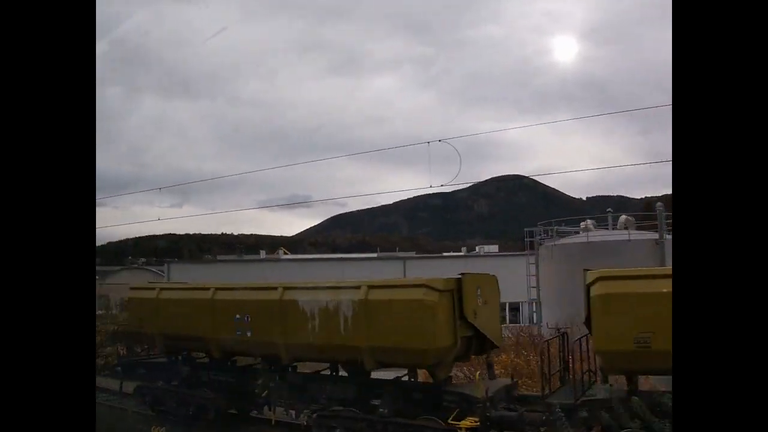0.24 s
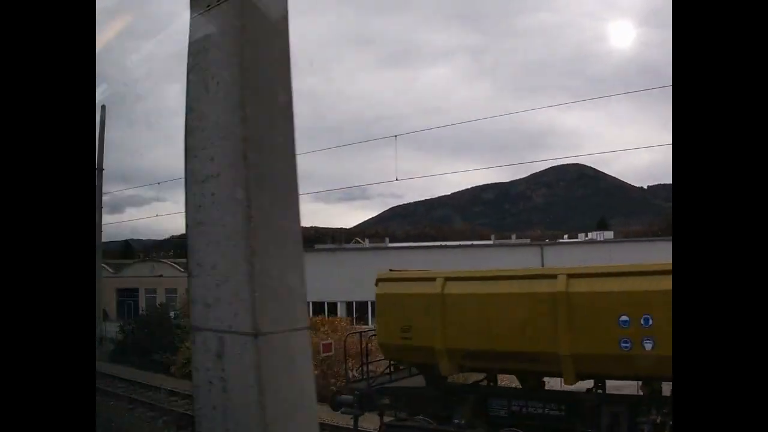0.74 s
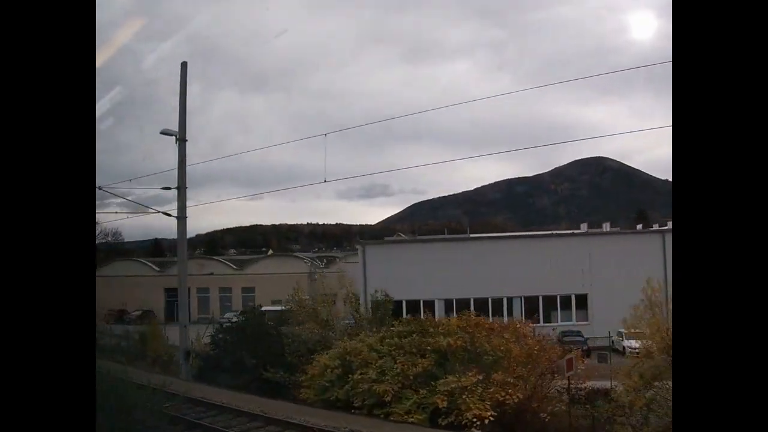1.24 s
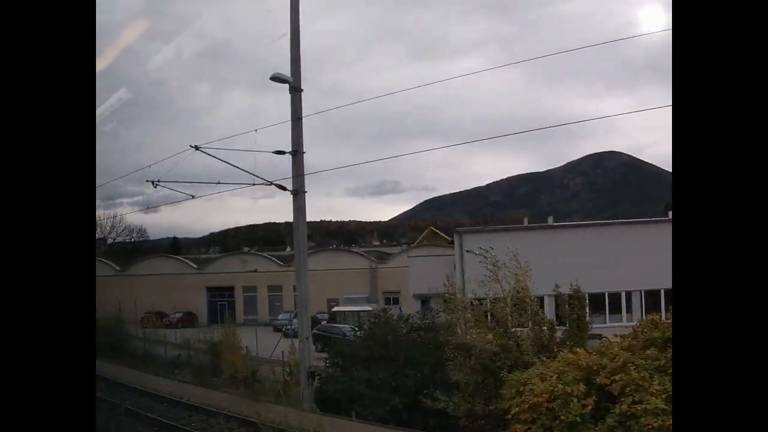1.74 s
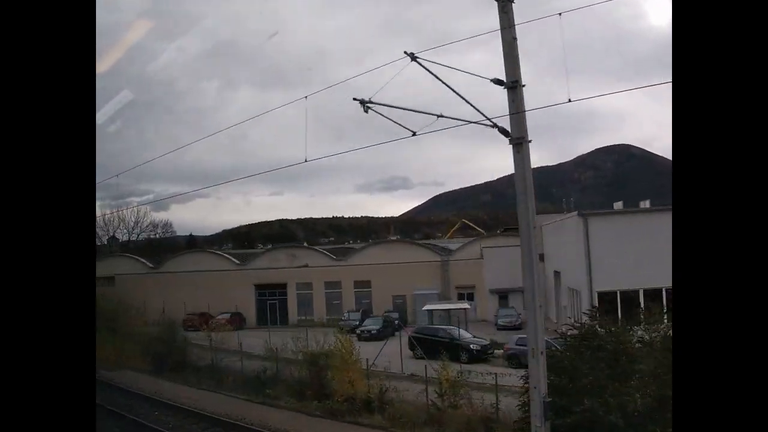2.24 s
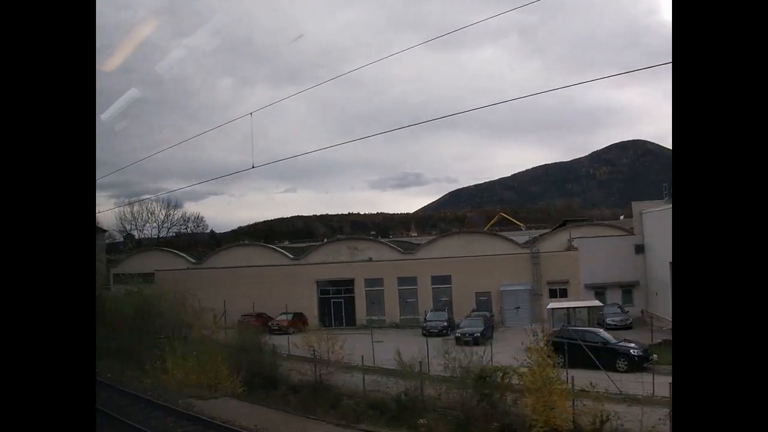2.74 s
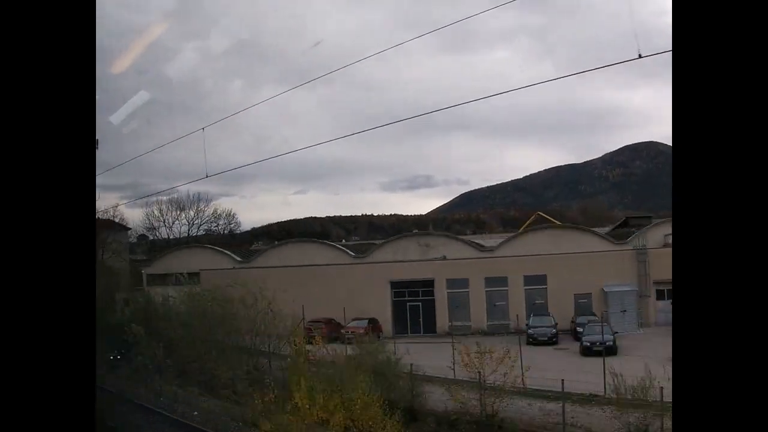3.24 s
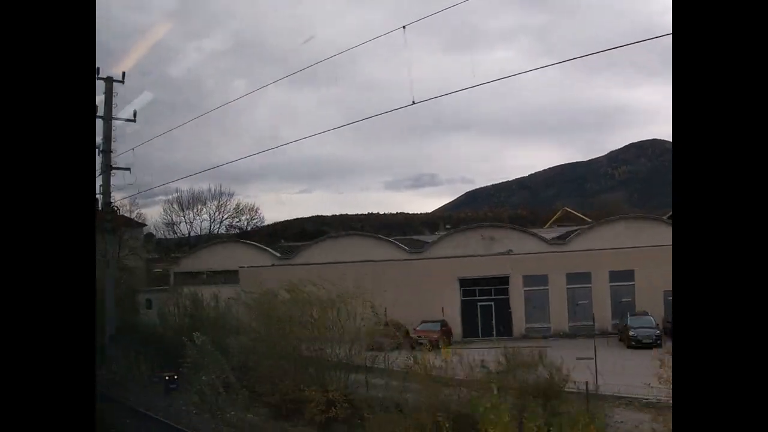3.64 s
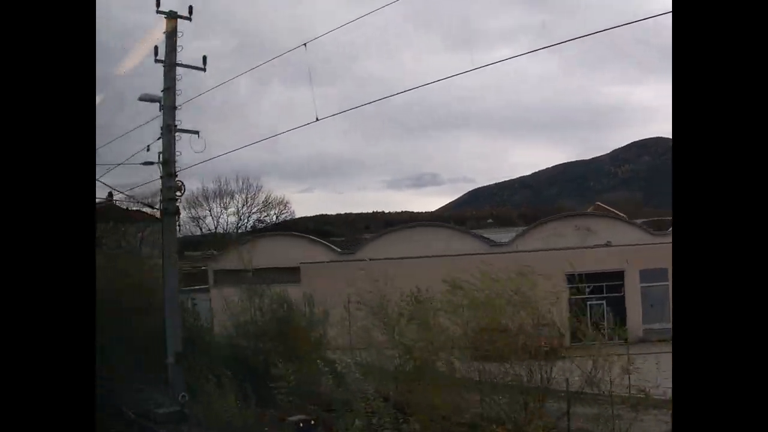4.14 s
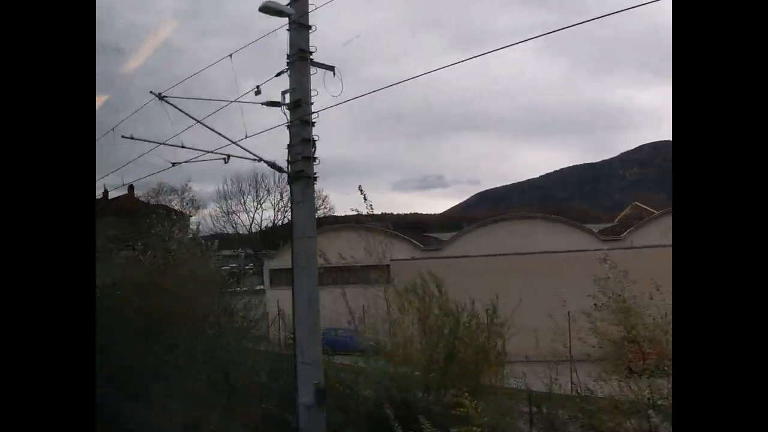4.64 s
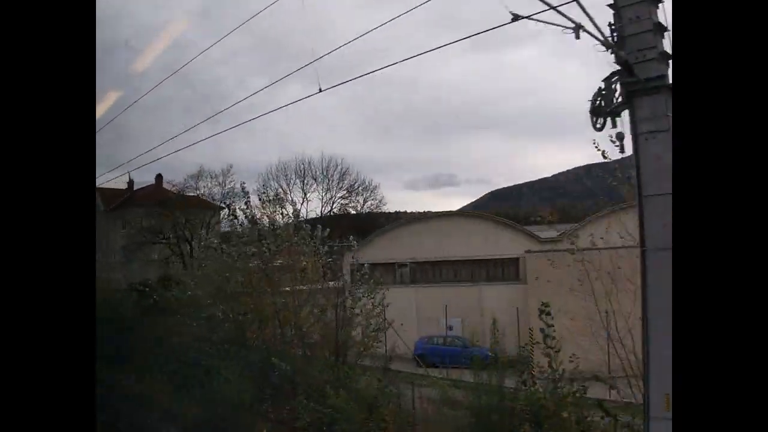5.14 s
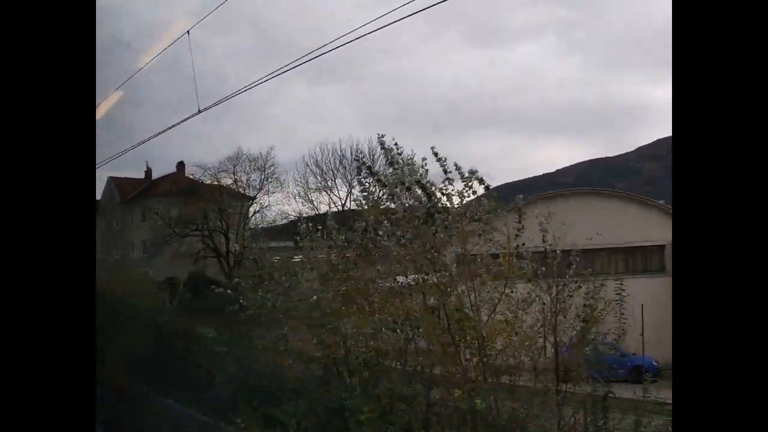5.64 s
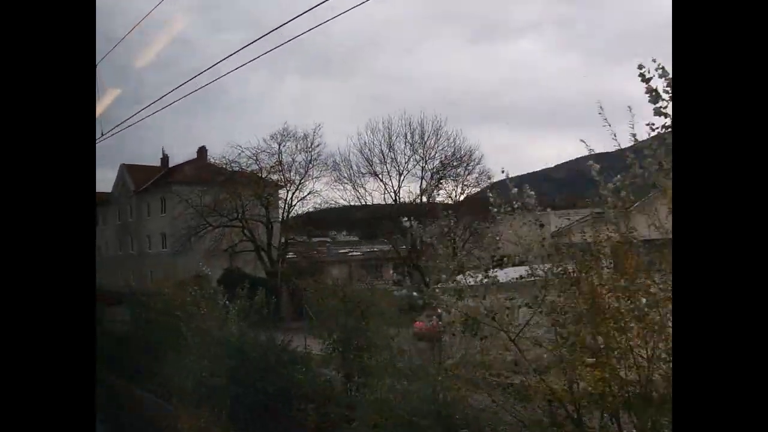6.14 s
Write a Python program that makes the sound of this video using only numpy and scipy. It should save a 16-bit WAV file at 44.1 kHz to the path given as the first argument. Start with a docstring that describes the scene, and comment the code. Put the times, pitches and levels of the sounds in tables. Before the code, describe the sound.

Heard from inside a rolling electric train carriage: a low, wavering wheel rumble and a muffled roar fill the cabin. Body resonances boom more strongly in the first two seconds as the track jolts. Fine rustling and airy hiss flutter above, with faint high electrical whines. A bright ping sounds around 2.4 seconds, followed by denser small clicks and hollow panel knocks, while the train keeps rolling steadily.

```python
"""Inside a rolling electric train carriage, with the microphone in the cabin. The wheels pass the sleepers as a
wavering low sine; bands of noise and two booming resonances are the car body, lifted now and then by a jolt.
Coloured noise makes the dull roar of rolling and ventilation, and a fine crackling rustle above it. Faint
electrical whines are mostly very narrow noise, with one broader hissing band; clicks are noise bursts with a
short cabin tail, the strongest with sharp noisy attacks, among damped-sine panel knocks and brief sine pings."""
import sys
import numpy as np
from scipy import signal
from scipy.io import wavfile
from scipy.ndimage import uniform_filter1d

SR = 44100
rng = np.random.default_rng(int(sys.argv[2]) if len(sys.argv) > 2 else 0)


def log_audio(samples):
    """Write samples as a 16-bit WAV file to the path given in sys.argv[1]."""
    # one column per channel
    frames = np.atleast_2d(samples).T
    # limit to full scale, then quantise
    limited = np.clip(frames, -1, 1)
    pcm = np.round(limited * 32767).astype(np.int16)
    wavfile.write(sys.argv[1], SR, pcm)


N = 281358   # samples in the scene

# Jolts from the track: (time [s], sway level [dB], floor shake level [dB], lower boom level [dB],
# upper boom level [dB], lower boom pitch [Hz])
JOLTS = [(0.071, -21, -24.5, -24, -33, 151), (.14, -36, -30, -39, -19.5, 150),
         (0.219, -33, -50, -11.5, -25, 146), (.39, -23, -45, -26.5, -23.5, 146),
         (.51, -47, -40, -23, -23, 148), (.7, -24, -47, -40, -25, 150), (.79, -36, -37, -25.5, -23.5, 150),
         (.99, -29, -38, -21.5, -20.5, 146), (1.14, -32, -44, -36, -28, 146),
         (1.29, -17.5, -30, -18.5, -48, 144), (1.4, -27.5, -40, -39, -28, 140.7),
         (1.539, -31, -27, -20.5, -43, 141), (1.66, -15.5, -29, -42, -30, 145.6),
         (1.79, -33, -24, -36, -47, 142), (1.94, -21, -44, -30.5, -33.5, 137),
         (2.14, -24, -39, -48, -29, 141), (2.58, -40, -27.5, -35, -45.5, 146),
         (3.01, -31, -30, -33, -33, 139), (3.3, -39, -30.5, -47, -29.5, 140),
         (3.52, -39, -49, -47, -35, 147), (4.33, -23, -23.5, -24, -27.5, 137),
         (4.48, -25, -28.5, -35, -29, 137), (5.57, -36, -32, -25.5, -34, 144),
         (5.729, -28, -43, -28, -35, 145), (6.27, -23.5, -47, -36, -36.5, 142)]


def amp(db):
    """Decibels to gain."""
    return 10 ** (np.asarray(db) / 20)


def rms_one(x):
    """Scale to rms 1."""
    return x / np.sqrt(np.mean(x ** 2) + 1e-20)


def in_time(rows):
    """Columns of a (time [s], values) table, one value per sample."""
    s, *columns = np.transpose(rows)
    return [np.interp(np.arange(N) / SR, s, column) for column in columns]


def drift(rate_hz):
    """Slow chance: noise low-passed near this rate, spread about 1."""
    step = 40   # samples between the slow values
    pole = np.exp(-2 * np.pi * rate_hz * step / SR)
    noise = rng.standard_normal(N // step + 2002)
    slow = signal.lfilter([1], [1, -2 * pole, pole * pole], noise)[2000:]
    return np.interp(np.arange(N) / step, np.arange(len(slow)), rms_one(slow))


def band(low_hz, high_hz, order=2):
    """Fresh noise in a band, after a second of run-in; rms 1."""
    sos = signal.butter(order, [low_hz, high_hz], "band", fs=SR, output="sos")
    return rms_one(signal.sosfilt(sos, rng.standard_normal(N + SR))[SR:])


def evened(x, window_s, share):
    """A sustained vibration swings steadier than noise: part of the chance swells is divided out; rms 1."""
    swell = uniform_filter1d(x ** 2, int(window_s * SR)) + 1e-3
    return rms_one(x / swell ** (np.clip(share, 0, 1) / 2))


def coloured(spectrum, patchy_db):
    """Narrow bands of noise, five an octave, each with its level and its own flicker; rms 1."""
    hz, level_db = np.transpose(spectrum)
    edges = hz[0] * 2 ** np.arange(0, np.log2(hz[-1] / hz[0]), 1 / 5)
    out = np.zeros(N)
    for low, high in zip(edges, edges[1:]):
        centre_log_hz = np.log(low * high) / 2
        per_hz_db = np.interp(centre_log_hz, np.log(hz), level_db)
        gain = amp(per_hz_db + patchy_db * drift(4.0)) * np.sqrt(high - low)
        out += gain * band(low, high, order=3)
    return rms_one(out)


def sleepers():
    """Wheels over sleepers: a near sine that wavers a little in pitch and level."""
    # (time [s], pitch [Hz], level [dB])
    sleeper_tone = [(0, 44.4, -30.5), (.4, 48, -36), (.7, 44.39, -44), (.97, 51.35, -25),
                    (1.2, 59.67, -41.5), (1.3, 66.04, -32.5), (1.62, 64.7, -23.5), (1.7, 65.3, -19.5),
                    (1.84, 67.1, -38.5), (1.95, 65.5, -27), (2.38, 61.25, -30), (2.55, 48.72, -35),
                    (2.9, 51.02, -40.5), (3.06, 50.53, -24.5), (3.2, 50.6, -37.5), (3.58, 58.54, -20.5),
                    (3.8, 59.47, -24), (4.1, 58.7, -20), (4.17, 57.3, -30.5), (4.25, 52.67, -22.5),
                    (4.45, 53.74, -43), (4.7, 55.17, -32.5), (4.93, 58.87, -25.5), (5.1, 60.8, -32.5),
                    (5.22, 45.64, -34.5), (5.95, 48.38, -41), (6.1, 51.93, -25), (6.25, 61.2, -33.5),
                    (6.38, 61.7, -24.5)]
    hz, level_db = in_time(sleeper_tone)
    phase = 2 * np.pi * np.cumsum(hz + 0.75 * drift(5.7)) / SR
    return np.sqrt(2) * amp(level_db + 0.92 * drift(7.0)) * np.sin(phase)


def jolted(steady_db, column):
    """Steady, slightly restless level; the power of each jolt rises quickly on top and dies away."""
    rise_s, t60_s, unrest_db = 0.024, 0.42, 1.2
    t = np.arange(N) / SR
    power = amp(steady_db + unrest_db * drift(3.4)) ** 2
    for jolt in JOLTS:
        after = np.maximum(t - jolt[0], 0)
        rise = 1 - np.exp(-after / rise_s)
        decay = amp(jolt[column] - 60 * (after - rise_s) / t60_s)
        power = power + (decay * rise) ** 2
    return np.sqrt(power)


def boom(hz, low_hz, high_hz):
    """A body resonance: a wavering tone inside a halo of shaking noise; rms about 1."""
    phase = 2 * np.pi * np.cumsum(hz + 2.1 * drift(6.0)) / SR
    tone = np.sqrt(2) * amp(1.4 * drift(23.0)) * np.sin(phase)
    halo = evened(band(low_hz, high_hz, order=4), .12, .4)
    return .88 * tone + .47 * halo


def car_body():
    """Sway, floor shake and two booms, each driven by the rough track."""
    # Steady roughness of the track in the body: (time [s], sway level [dB], floor shake level [dB],
    # lower boom level [dB], upper boom level [dB])
    track = [(0, -32.5, -27.5, -32, -29), (.3, -27, -43, -31.5, -26.5), (.6, -38, -36, -32.5, -32),
             (1.15, -32, -43.5, -44.5, -30.5), (1.35, -29.5, -28, -40.5, -41), (1.9, -38, -34, -44, -39.5),
             (2.5, -29.5, -40, -39.5, -42), (2.9, -42.5, -37, -38.5, -42), (3.3, -38.5, -38.5, -48, -43.5),
             (3.85, -30, -37, -45, -44), (4.2, -37, -32.5, -45, -39), (4.6, -34.5, -43, -40.5, -47),
             (4.85, -32.5, -37, -50.5, -46.5), (5.5, -32.5, -42.5, -48, -41),
             (5.8, -30.5, -32, -37.5, -42.5), (6.38, -35, -38, -49, -47)]
    # Wandering pitch of the upper boom: (time [s], pitch [Hz])
    upper_boom_pitch = [(0, 189.5), (.3, 184), (.52, 177.8), (.62, 185), (.98, 178), (1.2, 185.5),
                        (2.5, 183.1), (6.38, 180.9)]
    sway_db, shake_db, lower_db, upper_db = in_time(track)
    lower_hz, = in_time([(jolt[0], jolt[-1]) for jolt in JOLTS])
    upper_hz, = in_time(upper_boom_pitch)
    out = jolted(sway_db, column=1) * evened(band(19, 44.2, order=3), .1, .5)
    out += jolted(shake_db, column=2) * evened(band(76, 128, order=3), .06, .8)
    out += jolted(lower_db, column=3) * boom(lower_hz, 136.4, 167.5)
    return out + jolted(upper_db, column=4) * boom(upper_hz, 165, 203)


def rolling_roar():
    """Rolling roar through floor and windows: three coloured noises that surge together."""
    # (time [s], deep level [dB], middle level [dB], upper level [dB])
    roar_levels = [(0, -31, -49.5, -59), (.3, -36, -51.5, -59.5), (.9, -35.5, -51, -59),
                   (1.3, -34, -52.5, -58.5), (1.6, -35, -51.5, -59), (1.9, -38, -56, -63),
                   (2.3, -37.5, -55, -62), (2.6, -35.5, -52.5, -57.5), (2.9, -38, -54.5, -61.5),
                   (3.3, -38.5, -53.5, -59), (3.6, -36, -53, -60), (4.05, -39.5, -52, -61),
                   (4.15, -40.5, -49, -61.5), (4.27, -42.5, -51.5, -62), (4.45, -40, -53, -63),
                   (4.65, -36.5, -54, -63), (4.9, -42.5, -57, -64), (5.24, -41.5, -58.5, -63),
                   (5.5, -43.5, -56, -63.5), (5.8, -37, -53.5, -62), (6.38, -46.5, -56, -62)]
    # Spectra of the three parts: (frequency [Hz], relative level per Hz [dB])
    deep_spectrum = [(40, 3), (120, -9.5), (195, -4), (215, -8.5), (280, -11.5), (350, -18), (430, -19),
                     (520, -30.5), (700, -52)]
    middle_spectrum = [(350, -5.5), (500, 3.5), (700, 0), (870, -4), (1080, -4.5), (1370, -13),
                       (1700, -19.5)]
    upper_spectrum = [(1100, -15), (1370, -13), (1610, -6), (2520, -13.5), (3500, -24.5), (5300, -28.5),
                      (6500, -40), (9500, -53.5)]
    deep_db, middle_db, upper_db = in_time(roar_levels)
    surge_db = .6 * drift(8.0)
    roar = amp(deep_db + surge_db) * coloured(deep_spectrum, patchy_db=1.83)
    roar += amp(upper_db + surge_db) * coloured(upper_spectrum, patchy_db=0.5)
    roar += amp(middle_db + surge_db + .8 * drift(6.1)) * coloured(middle_spectrum, patchy_db=0.6)
    return roar + amp(deep_db - 17.0) * band(238, 260)   # a weak higher resonance of the body


def crackle_gain():
    """Random snaps of uneven size, each swelling the rustle at once and dying quickly."""
    snaps_per_s, mean_snap_db, t60_s = 30, -1, 0.035
    snaps = (rng.random(N) < snaps_per_s / SR) * rng.exponential(1, N) * amp(mean_snap_db) ** 2
    keep_per_sample = amp(-120 / (t60_s * SR))   # -120 because this is power
    return np.sqrt(1 + signal.lfilter([1], [1, -keep_per_sample], snaps))


def rustle():
    """Something light rustling in the cabin, and a rush of air: noise lifted by tiny crackles."""
    # (time [s], dull level [dB], bright level [dB])
    rustle_levels = [(0, -62, -69.5), (.28, -60, -72.5), (.5, -68, -76.5), (.8, -67.5, -86.5),
                     (.9, -66, -75.5), (1.15, -61.5, -77.5), (1.3, -63, -80.5), (1.5, -65, -77.5),
                     (1.62, -62.5, -71), (1.7, -55.5, -68.5), (1.76, -58, -66), (1.95, -60.5, -72),
                     (2.1, -64, -74), (2.25, -59, -69.5), (2.4, -58.5, -70), (2.7, -64, -72.5),
                     (3.0, -59.5, -74), (3.28, -67, -72), (3.36, -73, -87), (3.49, -75, -78),
                     (3.53, -69, -72), (3.7, -63, -73.5), (4.12, -64.5, -73.5), (4.4, -59.5, -70.5),
                     (4.57, -62, -67), (4.72, -64, -70.5), (4.87, -69, -79.5), (5.1, -63.5, -71.5),
                     (5.4, -68.5, -79), (5.72, -66.5, -84), (5.83, -64, -80), (6.0, -60, -73),
                     (6.15, -65, -74), (6.25, -78, -84), (6.38, -66, -76)]
    # Spectra of the two parts: (frequency [Hz], relative level per Hz [dB])
    dull_spectrum = [(900, -3.5), (1800, 1.5), (3000, -0.5), (4500, -7), (6100, -11), (8000, -37.5)]
    bright_spectrum = [(5000, -11), (6500, -2.5), (8200, -6), (9000, -11.5), (10300, -15.5), (11000, -24),
                       (12800, -29), (15000, -50)]
    # Rush of air that swells now and then: (time [s], level [dB])
    air_rush = [(0, -68.5), (1.4, -70.5), (1.7, -62), (1.95, -70), (2.6, -66), (3.28, -69.5), (3.4, -72),
                (4.25, -69.5), (4.45, -66), (4.7, -67), (4.85, -70.5), (5.2, -70), (5.6, -68.5),
                (5.85, -66.5), (6.05, -63), (6.2, -76), (6.38, -71)]
    dull_db, bright_db = in_time(rustle_levels)
    rush_db, = in_time(air_rush)
    crinkle_db = 1.0 * drift(28.0) + 0.75 * drift(3.7)   # both parts flutter together
    out = amp(dull_db + crinkle_db) * coloured(dull_spectrum, patchy_db=1.2)
    out += amp(bright_db + crinkle_db) * coloured(bright_spectrum, patchy_db=1.4)
    out += amp(rush_db) * band(2400, 3970)
    return crackle_gain() * out


def whines():
    """Electrical whines: mostly very narrow noise, with one broader hissing band near 7300 Hz."""
    # One row a whine or hiss: (centre [Hz], width [Hz])
    whine_bands = [(4956, 12), (5400, 80), (7041, 10), (7300, 400), (7500, 14), (9388, 10), (9765, 8)]
    # The same rows: (early level [dB], midway level [dB], late level [dB])
    whine_levels = [(-80, -90, -96), (-81, -95, -94), (-90, -87, -85), (-82, -84, -82), (-96, -88, -88),
                    (-99, -94, -93), (-101, -92, -91)]
    t, out = np.arange(N) / SR, np.zeros(N)
    for (hz, width_hz), levels_db in zip(whine_bands, whine_levels):
        level_db = np.interp(t, [.8, 3.0, 5.4], levels_db)
        noise = evened(band(hz - width_hz / 2, hz + width_hz / 2, order=1), 0.055, .7)
        out += amp(level_db) * noise
    return out


def clicks():
    """Each click is a soft crack of some milliseconds, then a diffuse tail from the cabin walls."""
    # Levels ahead of the click shape: (time [s], knock part [dB], dull part [dB], crisp part [dB],
    # bright part [dB])
    click_levels = [(.21, -61, -58, -58, -57), (.228, -58, -53, -54.5, -56), (.25, -56, -59, -59, -60),
                    (0.347, -52, -46.5, -48, -53), (.364, -52, -52, -63, -65),
                    (.82, -63.5, -65.5, -65.5, -69), (.8902, -52, -59, -61, -65.5),
                    (.972, -64, -63, -61, -68), (1.128, -62, -67, -59, -62), (1.152, -61, -66, -60, -60.5),
                    (1.18, -66, -64, -62, -64), (1.8614, -57, -57, -55.5, -56.5),
                    (1.9115, -64, -65, -65, -68), (2.1, -59, -66, -66, -62), (2.195, -64, -68, -60, -61),
                    (2.322, -62, -62, -61, -65), (2.3421, -59, -52, -57, -62), (2.397, -60, -56, -50, -50),
                    (2.425, -60, -58, -57, -69), (2.5421, -51, -52, -54.5, -59),
                    (2.63, -54, -47.5, -51.5, -60), (2.764, -55, -43, -49, -48),
                    (2.778, -62, -62, -63, -63), (2.855, -57, -60, -64, -59.5),
                    (2.8833, -62, -56, -65, -59), (2.933, -47, -47.5, -56, -51),
                    (2.943, -46.5, -52, -51, -56), (3.018, -56, -50, -56, -57),
                    (3.1245, -54, -61, -58, -60), (3.1723, -62, -52, -63, -61),
                    (3.2124, -60, -47, -49, -56), (3.2757, -58, -49, -50, -52.5),
                    (3.524, -62, -54, -59, -54.5), (3.5748, -58, -65, -62, -57),
                    (3.6486, -69, -58, -52, -65), (3.6918, -53, -52, -58, -59),
                    (3.817, -56, -50, -53, -61.5), (4.086, -52, -48.5, -47, -54),
                    (4.18, -61, -62, -64, -64), (4.2922, -54, -56, -65, -62), (4.3697, -65, -62, -64, -59),
                    (4.4481, -58, -55, -64, -55), (4.6882, -65, -66, -57, -70),
                    (5.0202, -69, -67, -73, -68), (5.1336, -62, -59, -57, -59),
                    (5.1924, -59, -55, -60, -53.5), (5.3407, -52, -64, -68, -69),
                    (5.4719, -51.5, -61, -66, -64), (5.5541, -62, -52, -59, -68),
                    (5.5609, -62, -50, -52.5, -59), (5.573, -55, -53, -56, -62),
                    (5.5827, -56, -51, -57, -63), (5.636, -55, -56, -67, -67), (5.789, -60, -56, -66, -72),
                    (5.8751, -54, -53, -63, -67), (5.9696, -54.5, -54, -64, -65),
                    (6.0135, -58, -50, -65, -66), (6.0328, -60, -50, -57, -60), (6.072, -52, -53, -58, -64),
                    (6.132, -56, -58, -61, -69), (6.141, -58, -58, -58, -63)]
    # The four parts in the same order: (low edge [Hz], high edge [Hz])
    click_bands = [(800, 1900), (1800, 4220), (4000, 6500), (6500, 8670)]
    crack_t60_s, cabin_t60_s, rise_s = 0.063, 0.25, 0.0023
    out, after = np.zeros(N), np.arange(SR // 3) / SR
    crack = amp(-60 * after / crack_t60_s)
    tail = amp(-3 - 60 * after / cabin_t60_s)
    shape = (1 - np.exp(-after / rise_s)) ** 2 * (crack + tail) / 2
    for k, (low_hz, high_hz) in enumerate(click_bands):
        power = np.zeros(N + len(after))
        for s, *level_db in click_levels:
            start = round((s - .003) * SR)
            power[start:][:len(after)] += (shape * amp(level_db[k])) ** 2
        envelope = np.sqrt(power[:N])
        rattle = amp(1.7 * drift(55.0))   # uneven, rattling tails
        out += envelope * rattle * band(low_hz, high_hz, order=3)
    # A thin airy edge rides on the bright part, the last envelope of the loop.
    edge = amp(-14) * band(8700, 10100, order=3) + amp(-20) * band(10000, 13500)
    return out + envelope * edge


def knocks():
    """Hollow knocks of a panel: one damped mode, struck softly."""
    # (time [s], level ahead of the soft rise [dB], pitch [Hz])
    panel_knocks = [(.348, -42, 1090), (2.766, -45, 960), (2.856, -39, 940), (2.944, -39, 990),
                    (3.277, -40, 908), (4.186, -40, 539.3), (4.228, -40, 540)]
    rise_s, t60_s = 0.0015, .028
    out, after = np.zeros(N), np.arange(SR // 10) / SR
    for s, level_db, hz in panel_knocks:
        swing = (1 - np.exp(-after / rise_s)) * amp(level_db - 60 * after / t60_s)
        start = round((s - .002) * SR)
        out[start:][:len(after)] += swing * np.sin(2 * np.pi * hz * after)
    return out


def click_attacks():
    """Sharp noisy attacks on the strongest clicks, plus a separate broad tick: short bursts of band noise."""
    # (time [s], level ahead of the rise [dB], low edge [Hz], high edge [Hz])
    attacks = [(.349, -50, 3500, 7000), (.357, -52, 1200, 3500), (2.765, -46, 1800, 9500),
               (2.944, -49, 900, 8500), (3.216, -52, 3000, 6500), (4.087, -53, 4500, 9000),
               (4.8075, -46.5, 1102, 6800), (5.5609, -45, 2600, 4274)]
    rise_s, t60_s = .0012, .028
    out, after = np.zeros(N), np.arange(SR // 30) / SR
    for s, level_db, low_hz, high_hz in attacks:
        burst = amp(level_db - 60 * after / t60_s) * (1 - np.exp(-after / rise_s))
        noise = band(low_hz, high_hz, order=4)[:len(after)]
        out[round(s * SR):][:len(after)] += burst * noise
    return out


def pings():
    """Something hard pings: a short tone swells for a millisecond or two and stops quickly."""
    # (time [s], peak level [dB], pitch [Hz])
    hard_pings = [(2.157, -57, 7910), (2.397, -29.5, 7700), (3.5762, -52, 8240), (3.757, -58, 7860),
                  (5.1924, -55, 7740)]
    out, from_peak = np.zeros(N), np.arange(SR // 100) / SR - .003
    for s, peak_db, hz in hard_pings:
        width_s = np.where(from_peak < 0, .0009, .0005)   # rise, fall
        swell = np.exp(-(from_peak / width_s) ** 2)
        start = round((s - .0014) * SR)
        out[start:][:len(from_peak)] += amp(peak_db) * swell * np.sin(2 * np.pi * hz * from_peak)
    return out


def scene():
    """All sources, one channel."""
    train = sleepers() + car_body() + rolling_roar() + whines()
    cabin = rustle() + clicks() + knocks() + click_attacks() + pings()
    return (train + cabin)[None]


def record(dry):
    """Faint microphone hiss; the top is cut, 40 dB down from the cutoff on."""
    cutoff_hz = 14700
    hiss = amp(-103) * rng.standard_normal(dry.shape)
    top_cut = signal.cheby2(12, 40, cutoff_hz, fs=SR, output="sos")
    return signal.sosfilt(top_cut, dry + hiss)


dry = scene()
out = record(dry)
log_audio(out)
```